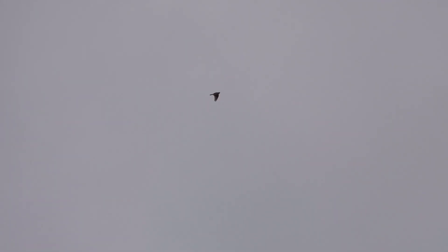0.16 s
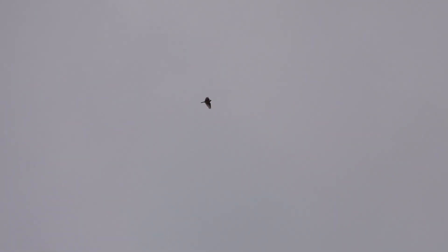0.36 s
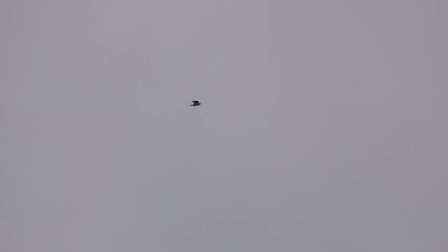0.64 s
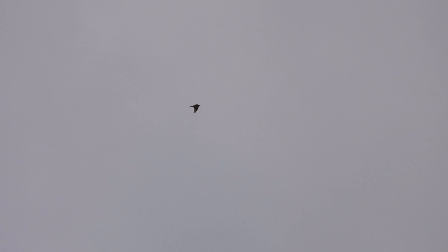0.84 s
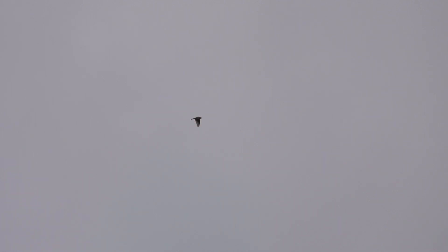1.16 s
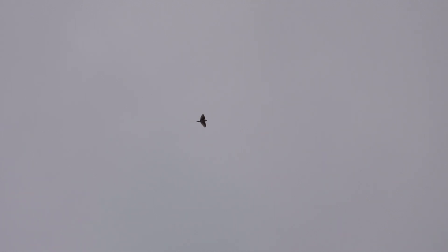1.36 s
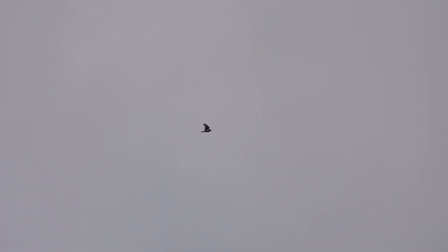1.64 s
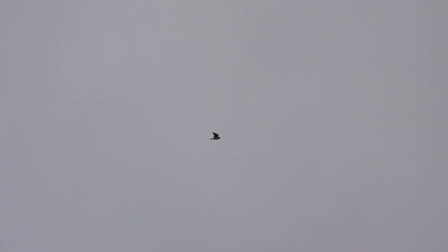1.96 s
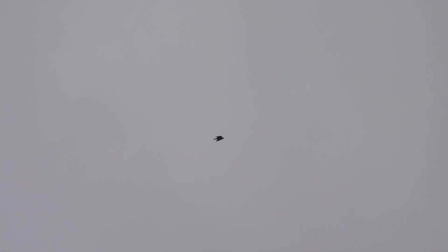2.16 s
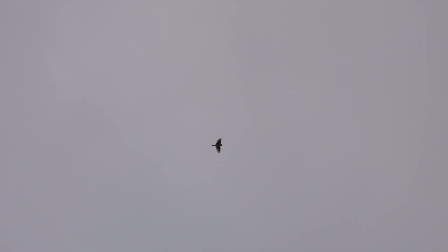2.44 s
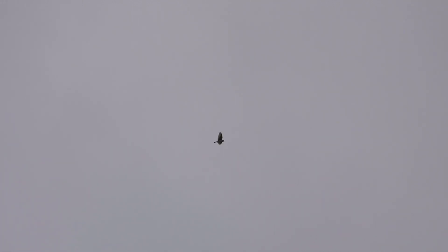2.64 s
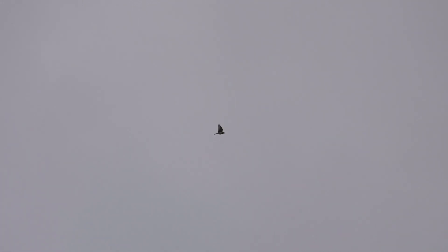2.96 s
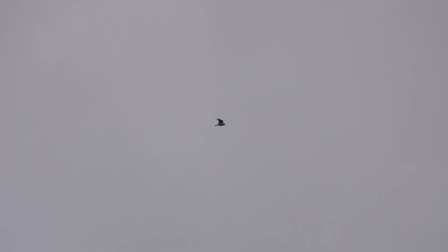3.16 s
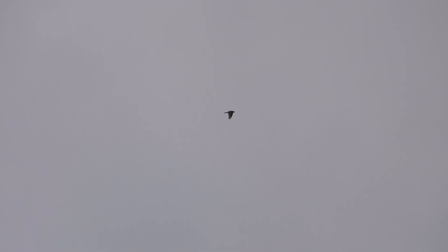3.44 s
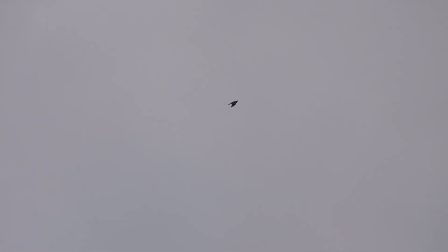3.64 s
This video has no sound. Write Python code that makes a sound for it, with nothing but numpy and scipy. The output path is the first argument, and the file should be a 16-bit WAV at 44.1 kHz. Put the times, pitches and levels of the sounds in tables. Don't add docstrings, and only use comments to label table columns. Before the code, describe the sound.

Skylark song of quick chirps and trills high overhead, under strong low rumbling wind gusts

```python
import sys
import numpy as np
from scipy import signal
from scipy.io import wavfile
from scipy.ndimage import uniform_filter1d

SR = 44100
rng = np.random.default_rng(int(sys.argv[2]) if len(sys.argv) > 2 else 0)


def wav_record(signal):
    frames = np.transpose(np.atleast_2d(signal))
    bounded = np.clip(frames, -1, 1)
    quanta = np.round(bounded * 32767).astype(np.int16)
    wavfile.write(sys.argv[1], SR, quanta)


def gain_from_db(level_db):
    decades = np.asarray(level_db, float) / 20
    return 10 ** decades


N = 167139


def evened(x):
    return x / np.sqrt(np.mean(x ** 2) + 1e-20)


def read(points, hz):
    f, value = np.transpose(points)
    return np.interp(np.log(hz + 1), np.log(f + 1), value)


def add(mix, start_s, sound):
    part = mix[round(start_s * SR):][:len(sound)]
    part += sound[:len(part)]


def drift(seconds, count=N):
    width = round(seconds * SR)
    once = uniform_filter1d(rng.standard_normal(count), width)
    return evened(uniform_filter1d(once, width))


def shaped(field, size):
    hz = np.fft.rfftfreq(size, 1 / SR)
    t = np.arange(4 * N // size + 5) * size / 4 / SR
    real, imag = rng.standard_normal((len(t), len(hz), 2)).T
    spectra = (real + 1j * imag) * gain_from_db(field(hz[:, None], t))
    return signal.istft(spectra, nperseg=size, noverlap=3 * size // 4)[1][:N]


def phrase(row, waver_hz=None, bend=1, swell_db=0, pulses_per_s=0, open_share=1, sweep_hz=0,
           haste_per_s=0, sag_hz=0):
    start_s, length_s, first_hz, last_hz, level_db = row
    haste_s, edge_s = .05, .002
    t = np.arange(0, length_s, 1 / SR)
    left = 1 - t / length_s
    path = left ** bend if bend > 0 else 1 - (1 - left) ** -bend

    pulses = pulses_per_s * t + haste_per_s * haste_s * (1 - np.exp(-t / haste_s))
    place = pulses % 1 / open_share
    gate = np.sin(np.pi * np.clip(place, 0, 1)) ** .6 if pulses_per_s else 1

    hz = last_hz + (first_hz - last_hz) * path + sag_hz * left
    hz = hz + sweep_hz * (np.minimum(place, 1) - .5)
    if waver_hz is not None:
        hz = hz + np.resize(waver_hz[round(start_s * SR):], len(t))
    edge = np.clip(np.minimum(t, length_s - t) / edge_s, 0, 1)
    tone = np.sin(2 * np.pi * np.cumsum(hz) / SR)
    return np.sqrt(2) * gain_from_db(level_db + swell_db * path) * edge * gate * tone


def sing(mix, rows, waver_hz=None, **manner):
    for row in rows:
        add(mix, row[0], phrase(row, waver_hz, **manner))


# start_s, length_s, first_hz, last_hz, level_db
GLIDE_NOTES = [(0, .057, 4800, 4200, -44), (.727, .066, 4350, 3650, -34), (1.062, .021, 5000, 4850, -41),
               (.902, .01, 1950, 2750, -40), (3.244, .021, 2170, 2050, -41), (1.219, .007, 5700, 5200, -35),
               (1.227, .007, 4900, 3800, -34), (1.235, .008, 3500, 2500, -36),
               (1.346, .026, 2950, 3200, -43), (3.228, .016, 1700, 2170, -43),
               (1.368, .013, 4500, 3350, -39), (1.381, .013, 3450, 4200, -41),
               (1.396, .025, 4600, 4720, -35), (1.649, .04, 4450, 3350, -48), (.478, .075, 3480, 3250, -46),
               (2.418, .008, 5000, 3900, -44), (2.43, .06, 3250, 3150, -41), (2.658, .024, 4600, 4750, -45),
               (2.249, .017, 5000, 5000, -41), (3.31, .028, 4550, 3750, -43),
               (3.452, .042, 6500, 5150, -45), (3.484, .028, 3100, 2300, -43),
               (3.634, .066, 2150, 2720, -41), (3.725, .035, 2900, 3500, -44),
               (3.302, .009, 3000, 4550, -42)]
HOOK_NOTES = [(1.001, .012, 2900, 4950, -36), (1.023, .017, 2900, 4880, -36),
              (1.045, .017, 2900, 4950, -36), (1.096, .009, 3100, 4000, -28),
              (1.111, .012, 3000, 3620, -29), (1.123, .057, 3250, 3570, -27),
              (2.188, .011, 3300, 4900, -41), (2.208, .018, 3300, 4830, -40), (2.23, .017, 3300, 4950, -40),
              (2.281, .009, 3200, 4000, -42), (3.341, .044, 2850, 3150, -33),
              (3.492, .032, 4350, 4780, -31), (3.631, .031, 4400, 4750, -36), (3.77, .02, 4400, 4750, -39),
              (3.108, .015, 4000, 4950, -44), (3.018, .007, 3600, 4500, -45),
              (3.079, .008, 3500, 4600, -42)]
DROOP_NOTES = [(3.006, .012, 2600, 2100, -40), (3.297, .018, 2650, 2100, -43),
               (1.095, .014, 2800, 2350, -39), (1.064, .03, 3300, 3150, -41)]
BUZZ_NOTES = [
    (.125, .243, 2900, 4080, -35),
    (1.74, .24, 3300, 4150, -42),
]
TRILL_NOTES = [
    (.51, .213, 5500, 4280, -28),
    (2.297, .04, 3500, 3600, -34),
]
SAW_NOTES = [
    (.91, .056, 2780, 4330, -32),
    (2.093, .056, 2700, 4550, -40),
]
RATTLE_NOTES = [
    (1.244, .072, 2470, 2260, -32),
]
STEP_NOTES = [
    (1.454, .1, 3950, 2500, -34),
    (2.721, .1, 3950, 2600, -34),
]
REEL_NOTES = [
    (3.424, .07, 3950, 4150, -29),
    (3.562, .071, 3950, 4150, -32),
    (3.7, .071, 3950, 4150, -36),
]
PLUNGE_NOTES = [
    (3.189, .026, 3330, 1950, -36),
    (3.024, .021, 4560, 3300, -44),
    (3.122, .032, 4950, 4200, -41),
    (.368, .074, 4150, 4030, -30),
]


def lark(waver_hz):
    x = np.zeros(N)
    trill = dict(bend=14, swell_db=-10, pulses_per_s=74, open_share=.62, sweep_hz=-100)
    buzz = dict(pulses_per_s=220, open_share=.95, sweep_hz=-250)
    sing(x, GLIDE_NOTES, waver_hz)
    sing(x, HOOK_NOTES, waver_hz, bend=7, swell_db=-1)
    sing(x, DROOP_NOTES, waver_hz, bend=.36, swell_db=-1)
    sing(x, BUZZ_NOTES, waver_hz, bend=3.2, swell_db=-9, **buzz)
    sing(x, SAW_NOTES, waver_hz, bend=1.2, swell_db=1, pulses_per_s=69, open_share=.62, sweep_hz=-1700)
    sing(x, PLUNGE_NOTES[:3], waver_hz, bend=-2.6)
    sing(x, PLUNGE_NOTES[3:], waver_hz, bend=-3, **buzz)
    sing(x, RATTLE_NOTES, waver_hz, pulses_per_s=105, open_share=.88, sweep_hz=100)
    sing(x, TRILL_NOTES[:1], haste_per_s=20, sag_hz=330, **trill)
    sing(x, TRILL_NOTES[1:], waver_hz, **trill)
    sing(x, STEP_NOTES, waver_hz, swell_db=-3, pulses_per_s=57.5, open_share=.65, sweep_hz=330)
    sing(x, REEL_NOTES, waver_hz, swell_db=-1, pulses_per_s=125, open_share=.5, sweep_hz=-1500)
    flutter_db = 1.4 * drift(.008)
    return x * gain_from_db(flutter_db)


# start_s,
# length_s, first_hz, last_hz, level_db
NEIGHBOUR_NOTES = [(.307, 0.026, 2970, 2950, -45), (.318, 0.016, 2250, 2490, -55),
                   (.44, .02, 2230, 2700, -44), (.472, 0.011, 2440, 2050, -40),
                   (.482, 0.036, 2070, 2560, -47), (.115, 0.016, 3320, 3130, -41),
                   (.356, 0.013, 3100, 2980, -48), (0.851, 0.021, 3360, 3380, -44),
                   (1.007, 0.023, 2780, 2600, -40.5), (1.021, 0.011, 1900, 2500, -57.5),
                   (1.031, 0.018, 2540, 2220, -39), (1.046, 0.0083, 2280, 2720, -43),
                   (1.073, .01, 2580, 2150, -41), (1.112, 0.0099, 2280, 2650, -39),
                   (1.455, 0.032, 2780, 2660, -37), (1.485, .014, 2510, 2200, -41),
                   (1.496, .014, 2200, 2630, -44), (1.553, .035, 2950, 2950, -44),
                   (1.6, 0.018, 2970, 3270, -47), (2.65, 0.011, 3760, 4150, -53),
                   (2.677, .009, 3000, 2750, -44), (2.691, 0.0089, 2980, 2670, -39),
                   (2.702, 0.017, 2480, 2900, -42), (2.732, .011, 3330, 2980, -40),
                   (2.804, 0.04, 2520, 1820, -49), (2.818, 0.01, 2620, 2400, -37),
                   (2.849, .05, 2850, 2880, -41), (2.899, .024, 2880, 2200, -41),
                   (3.042, .02, 4600, 4750, -52), (3.052, .008, 5200, 5000, -46),
                   (3.091, 0.01, 4600, 4000, -44), (3.102, 0.0099, 2450, 2300, -39.5),
                   (1.978, .014, 4100, 3800, -41), (3.192, 0.021, 2725, 2070, -42),
                   (3.51, 0.0044, 2240, 1800, -38), (2.46, .04, 2500, 2200, -44.5),
                   (2.206, 0.062, 3130, 3120, -45.5)]


def neighbour(waver_hz):
    x = np.zeros(N)
    sing(x, NEIGHBOUR_NOTES, 2 * waver_hz)
    ragged_db = 1.5 * drift(.004)
    return x * gain_from_db(ragged_db)


def ground_smeared(song):
    echo_db, echo_t60_s, count = -17, .12, 5000
    decay = gain_from_db(-60 * np.arange(count) / SR / echo_t60_s)
    echo = evened(rng.standard_normal(count) * decay) / np.sqrt(count)
    return song + gain_from_db(echo_db) * signal.oaconvolve(song, echo)[:N]


# time_s, level_db
GUST_LEVELS = [(0.0, -5.5), (0.37, -15.5), (0.67, -6), (0.75, -9), (1.13, -8), (1.37, -14), (1.46, -11),
               (1.78, -10), (1.83, -14), (2.13, -11.5), (2.15, -13), (2.33, -11.5), (2.43, -20),
               (2.66, -12), (2.75, -17), (3.28, -8), (3.74, -6), (3.79, -2.5)]
# freq_hz, density_db (per Hz)
BUFFET_SPECTRUM = [(8.8, -54), (15, 0), (37, -4), (54, -0.5), (122, -6.5), (189, -14.5), (600, -44.5),
                   (780, -49), (1320, -120)]


def wind():
    lump_db, lump_s, brighten_per_octave = 1.5, .022, .44
    time_s, level_db = np.transpose(GUST_LEVELS)

    def field(hz, t):
        below_peak_db = np.interp(t, time_s, level_db) - level_db.max()
        tilt_db = brighten_per_octave * below_peak_db * np.log2(1 + hz / 100)
        return read(BUFFET_SPECTRUM, hz) - 200 * (hz > 700) + tilt_db

    x = shaped(field, size=4096)
    x = x / np.sqrt(uniform_filter1d(x ** 2, SR // 4))
    x = evened(x * gain_from_db(lump_db * drift(lump_s)))
    return x * gain_from_db(np.interp(np.arange(N) / SR, time_s, level_db))


# start_s, level_db, main_hz
SHUTTER_SNAPS = [
    (2.187, -15.5, 3494),
    (2.19, -19.5, 2910),
    (2.332, -13.5, 2720),
    (2.34, -17.5, 2970),
    (2.343, -21, 2810),
]
# freq_hz, level_db, t60_s; main_hz replaces the first frequency
BODY_BANDS = [(2827, 2, 0.058), (3146, -3, 0.14), (5900, -17, 0.017), (10050, -1, 0.02), (12180, -5, 0.032),
              (15300, -10, .02)]
# freq_hz, level_db, t60_s
SPRING_RINGS = [(13650, -27, .2), (5900, -13, .05)]


def shutter():
    body_width_hz, crack_db, crack_t60_s = 780, 1, .0085
    x, t = np.zeros(N), np.arange(6000) / SR
    high = signal.butter(3, 1800, "high", fs=SR)
    for start_s, level_db, main_hz in SHUTTER_SNAPS:
        bands = [(main_hz, *BODY_BANDS[0][1:])] + BODY_BANDS[1:]
        noise = rng.standard_normal((len(bands), len(t)))
        shake = evened(uniform_filter1d(noise, round(SR / body_width_hz)))
        ring = np.zeros(len(t))
        for (hz, db, t60_s), wobble in zip(bands, shake):
            ring += gain_from_db(db - 60 * t / t60_s) * np.sin(2 * np.pi * hz * t) * (.53 + .88 * wobble)
        for hz, db, t60_s in SPRING_RINGS:
            ring += gain_from_db(db - 60 * t / t60_s) * np.sin(2 * np.pi * hz * t)
        crack = signal.lfilter(*high, rng.standard_normal(len(t))) * gain_from_db(crack_db - 60 * t / crack_t60_s)
        add(x, start_s, gain_from_db(level_db) * (ring + crack) / 2)
    return x


# start_s, level_db, brightness_hz
DRY_TICKS = [(.645, -34, 7000), (.661, -26.5, 8900), (.674, -27, 2010), (.699, -31, 8000),
             (1.335, -24, 5450), (1.366, -28, 5500), (2.56, -30, 2500), (3.11, -29.5, 8950),
             (3.228, -37, 6000), (3.445, -28, 3000), (3.787, -30, 12000)]


def dry_ticks():
    tick_t60_s = .006
    x, t = np.zeros(N), np.arange(6000) / SR
    for start_s, level_db, brightness_hz in DRY_TICKS:
        band = signal.butter(2, [700, min(brightness_hz, 15000)], "band", fs=SR)
        burst = rng.standard_normal(len(t)) + 4 * (t == 0)
        knock = burst * gain_from_db(level_db - 60 * t / tick_t60_s)
        add(x, start_s, signal.lfilter(*band, knock) * np.sqrt(SR / 2 / brightness_hz))
    return x


# freq_hz, width_hz, level_db
WHIR_BANDS = [(438, 48, -45.5), (716.3, 12.2, -45.5), (988, 54, -43), (1238, 23, -48.5)]


def whir():
    x = np.zeros(N)
    for hz, width_hz, level_db in WHIR_BANDS:
        r = np.exp(-np.pi * width_hz / SR)
        poles = [1, -2 * r * np.cos(2 * np.pi * hz / SR), r * r]
        band = evened(signal.lfilter([1], poles, rng.standard_normal(N)))
        x += gain_from_db(level_db + 2.43 * drift(.068)) * band
    return x


# freq_hz, density_db (per Hz)
AIR_SPECTRUM = [(250, -7), (330, -0.5), (1250, -9.5), (1450, -14.5), (3500, -17.5), (5000, -23.5),
                (16000, -25.5)]


def air():
    level_db = -38.5
    wash = shaped(lambda hz, t: read(AIR_SPECTRUM, hz) - 60 * (hz < 250) + 0 * t, size=1024)
    return gain_from_db(level_db) * evened(wash)


def far_larks(count=900):
    level_db, low_hz, high_hz, smear_t60_s = -47.5, 2100, 3600, .07
    x = np.zeros(N)
    for when, long, pitch, slide, faint in rng.random((count, 5)):
        first_hz = low_hz + pitch * (high_hz - low_hz)
        last_hz = first_hz * (.8 + .4 * slide)
        length_s = .008 + .03 * long ** 2
        add(x, when * N / SR, phrase((0, length_s, first_hz, last_hz, -8 * faint)))
    smear = rng.standard_normal(4000) * gain_from_db(-60 * np.arange(4000) / SR / smear_t60_s)
    return gain_from_db(level_db) * evened(signal.oaconvolve(x, smear)[:N])


DUCK_TIMES = [3.263, 3.313, 3.446, 3.6, 3.62]


def scene():
    gusts = wind()
    background = air() + whir()
    waver_hz = 11 * drift(.012)
    song = ground_smeared(lark(waver_hz) + neighbour(waver_hz))
    quiet = background + song + far_larks() + shutter() + dry_ticks()

    duck_db, duck_s = -7, .022
    late_s = np.arange(N) / SR - np.c_[DUCK_TIMES]
    dip_db = duck_db * np.sum((late_s > 0) * np.exp(-(late_s / duck_s) ** 2), axis=0)
    dip = gain_from_db(uniform_filter1d(dip_db, size=128))
    return (gusts + dip * quiet)[None]


def band_limit(x):
    return signal.sosfilt(signal.butter(12, 16450, fs=SR, output="sos"), x)


def record(dry):
    knee, top_hz = 4, 15850
    held = dry / (1 + abs(dry) ** (2 * knee)) ** (.5 / knee)
    lowpass = signal.firwin(401, top_hz, fs=SR)
    mix = signal.oaconvolve(held, lowpass[None], "same")
    return band_limit(mix)


dry = scene()
out = record(dry)
wav_record(out)
```